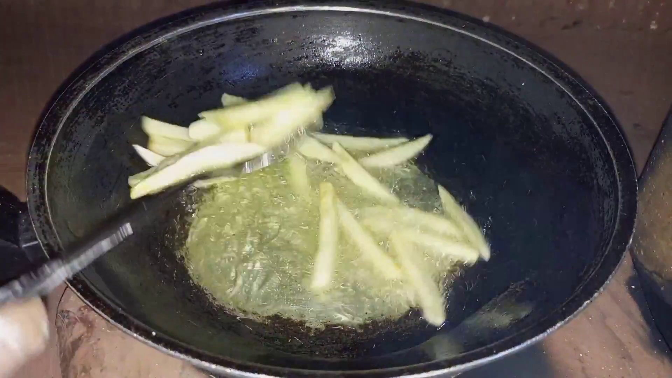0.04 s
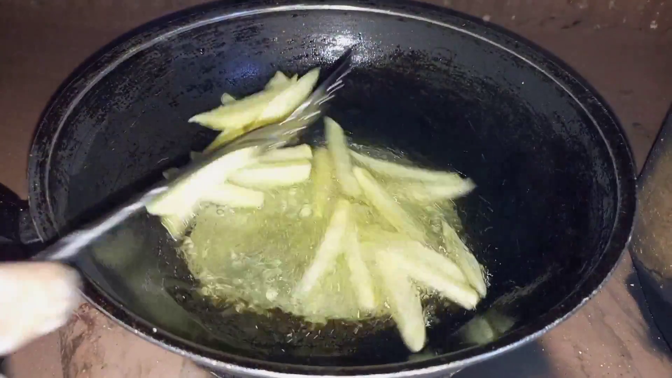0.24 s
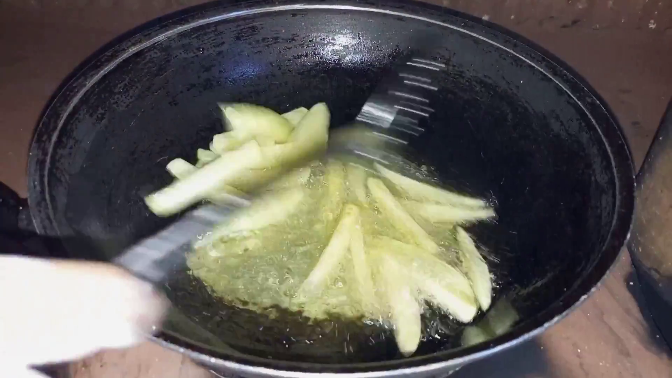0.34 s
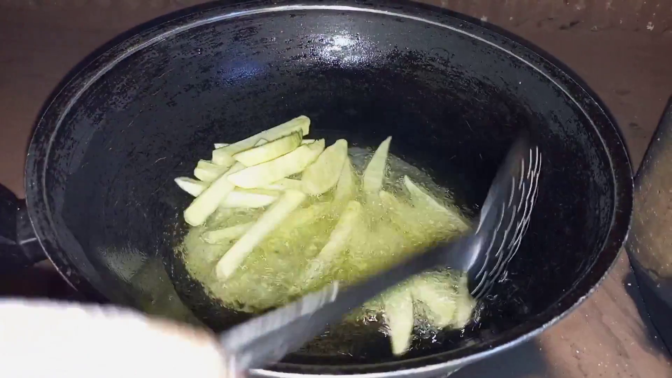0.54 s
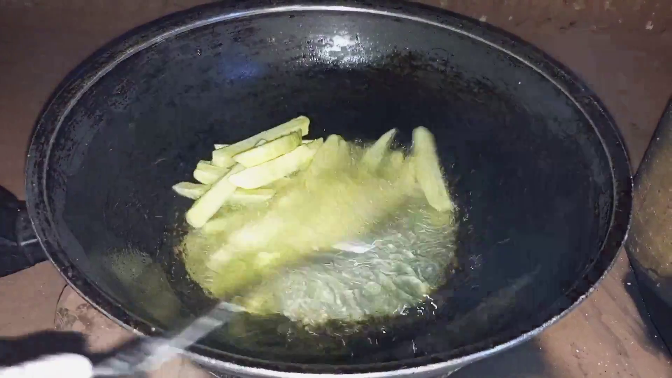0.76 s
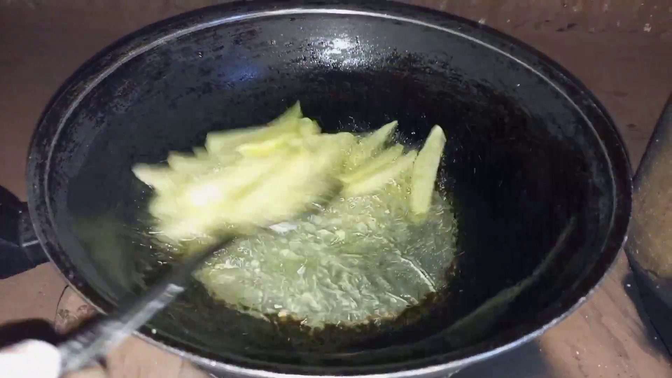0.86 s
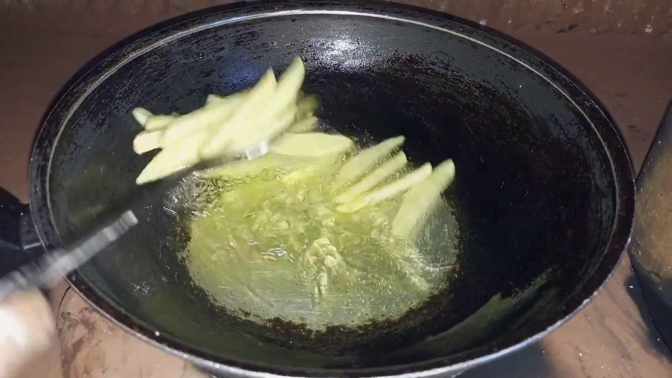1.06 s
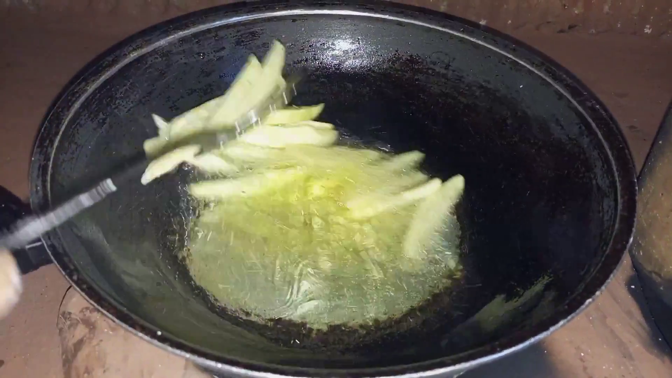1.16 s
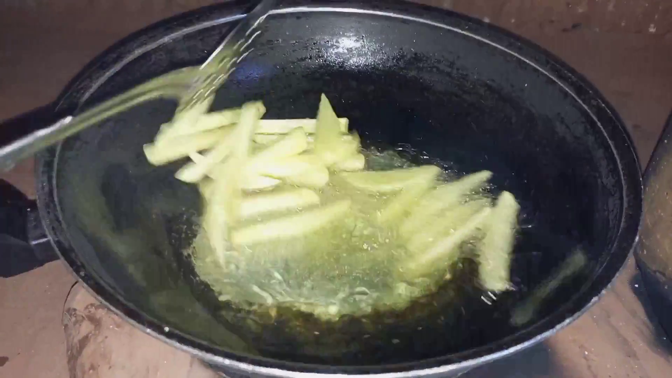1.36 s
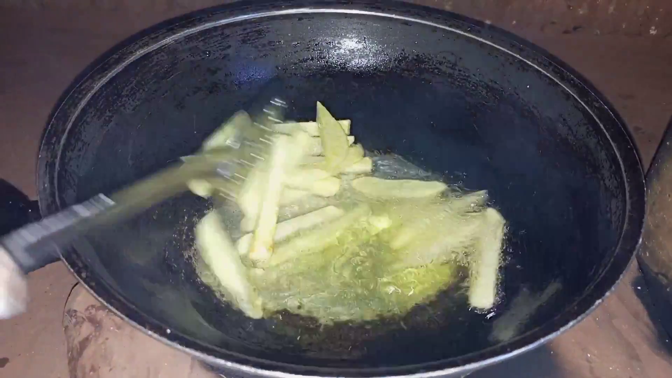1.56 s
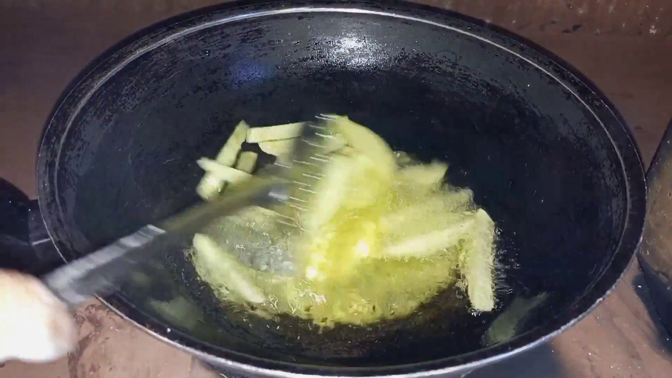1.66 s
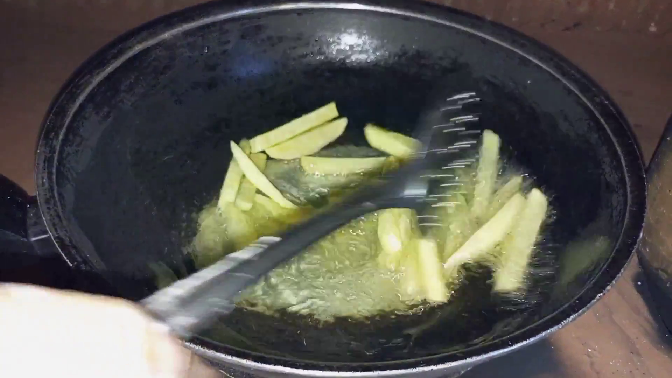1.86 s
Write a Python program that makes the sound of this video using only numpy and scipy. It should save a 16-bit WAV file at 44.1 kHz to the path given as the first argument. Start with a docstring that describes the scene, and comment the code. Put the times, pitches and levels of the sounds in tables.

```python
"""Frying oil fizzes throughout: hiss plus tiny bubble bursts, with a restless treble over a steadier low part.
Potato sticks cook in an iron wok while a slotted metal skimmer stirs them.
Food nudges single modes of the metal; the skimmer's slides drive all modes with random slips,
and its knocks set them off together. Soft low bumps of swelling noise come through the stove."""
import sys
import numpy as np
from scipy import signal
from scipy.io import wavfile
from scipy.ndimage import uniform_filter1d

SR = 44100
rng = np.random.default_rng(int(sys.argv[2]) if len(sys.argv) > 2 else 0)


def pcm_store(signal):
    """Save signal as 16-bit PCM."""
    levels = np.round(np.clip(np.atleast_2d(signal), -1, 1) * 32767)
    wavfile.write(sys.argv[1], SR, levels.astype(np.int16).T)


def volts_from_db(level):
    """Convert decibel levels to linear amplitude ratios."""
    exponent = np.asarray(level, float) / 20
    return 10 ** exponent


N = 85995

# modes of wok and skimmer: frequency [Hz]
METAL_HZ = [337, 440, 558, 590, 669, 785, 834, 975, 1125, 1190, 1258, 1385, 1530, 1690, 1770, 1840, 1935,
            2125, 2405, 2530, 2690, 2830, 3150, 3340, 3700, 3985, 4570, 4810, 5120, 5187, 5500, 5789, 5950,
            6222, 6475, 6610, 6975, 7351, 7396, 10932]


def evened(x):
    """Scales to rms 1."""
    return x / np.sqrt(np.mean(x ** 2) + 1e-20)


def add(mix, start_s, sound):
    """Mixes a sound in at start_s, cut at the end of the mix."""
    part = mix[round(start_s * SR):][:len(sound)]
    part += sound[:len(part)]


def clicks(per_s, spread_db, size):
    """Random clicks of either sign; their dB offsets are exponentially distributed, up to 5 spreads."""
    when = rng.random(size)
    offset = np.minimum(rng.exponential(1, size), 5)
    sign = rng.choice([-1, 1], size)
    return (when < per_s / SR) * sign * volts_from_db(spread_db * offset)


def octave_bell(x, time_s, centre_hz, spread_oct):
    """Keeps a bell-shaped range of octaves round a centre that may move in time."""
    hz, t, z = signal.stft(x, SR, nperseg=1024, noverlap=896)
    off = np.log2((hz[:, None] + 1) / np.interp(t, time_s, centre_hz)) / spread_oct
    return signal.istft(z * np.exp(-off ** 2 / 2), nperseg=1024, noverlap=896)[1][:len(x)]


def resonate(x, hz, width_hz):
    """A resonance of gain 1: shift hz down to zero, smooth with one pole, shift back."""
    turn = np.exp(2j * np.pi * np.cumsum(hz * np.ones(len(x))) / SR)
    r = np.exp(-np.pi * width_hz / SR)
    return 2 * (turn * signal.lfilter([1 - r], [1, -r], x / turn + 1e-18)).real


def ring(weight):
    """All modes of the metal set off at once as decaying sines, each with its weight."""
    # decay of each mode, in the order of METAL_HZ: (level [dB], t60 [s])
    metal_ring = [(4.5, 0.065), (-4.5, 0.061), (3.5, 0.061), (1.5, 0.061), (-10.5, 0.45), (-0.5, 0.075),
                  (-9, 0.13), (-7, 0.17), (4.5, 0.046), (-6, 0.18), (-11.5, 0.25), (-9.5, 0.16),
                  (-3, 0.026), (-19, 0.14), (-8.5, 0.11), (-8.5, 0.097), (1, 0.061), (-4, 0.066),
                  (1, 0.042), (0.5, 0.047), (-5.5, 0.083), (-9, 0.067), (-6.5, 0.091), (-5, 0.051),
                  (-23, 0.34), (-13, 0.15), (-4.5, 0.054), (-4, 0.044), (-9.5, 0.35), (1, 0.066),
                  (-30, 0.026), (-4.5, 0.17), (-11, 0.12), (7.5, 0.038), (-3.5, 0.19), (4.5, 0.054),
                  (-24, 0.14), (5.5, 0.13), (-19, 0.059), (0.5, 0.12)]
    hz = np.c_[METAL_HZ]
    db, t60_s = np.transpose(metal_ring)[:, :, None]
    t = np.arange(SR // 3) / SR
    modes = volts_from_db(db - 60 * t / t60_s) * np.sin(2 * np.pi * hz * t)
    return (weight[:, None] * modes).sum(0)


def bubble_pops():
    """Bubbles bursting in the oil: random clicks ring short, fast-damped sines of 12 pitches."""
    pops_per_s, pop_spread_db = 2500, -1  # rate over all pitches
    t = np.arange(1, 60) / SR
    pops = np.zeros(N)
    for hz in np.geomspace(1500, 16000, 12):
        burst = np.sin(2 * np.pi * hz * t) * t * np.exp(-t * hz / 0.88) * hz ** 0.5
        pops += signal.oaconvolve(clicks(pops_per_s / 12, pop_spread_db, size=N), burst)[:N]
    return pops


def fizz():
    """Hiss plus bubble pops, patchy and flickering; the treble follows the frying, the low part is steadier."""
    # relative spectrum of the fizz: (frequency [Hz], density [dB per Hz])
    fizz_spectrum = [(25, -48), (60, -24.5), (140, -8.5), (230, -22), (400, -16), (700, -18.5), (1200, -18),
                     (1900, -9), (3030, -16.5), (3900, -12), (4400, -18), (5300, -6.5), (6600, 1.5),
                     (7800, -3), (9000, 2), (10000, -2.5), (11000, -14.5), (12500, -21.5), (14000, -21),
                     (15600, -7)]
    # treble course before gain_db: (time [s], level [dB])
    fizz_level = [(0, -55.5), (.2, -52), (.5, -50), (.7, -51), (.85, -49.5), (1.05, -53), (1.3, -48.5),
                  (1.55, -50.5), (1.7, -51), (1.8, -53.5), (1.95, -52)]
    gain_db, pop_share = 4, 0.08  # share of power, above 1200 Hz only
    steady_below_hz, steady_db = 1770, -53  # steady_db is before gain_db
    patchy_db, flicker_db = 1.9, 0.6  # rms
    hz, s, z = signal.stft(bubble_pops(), SR, nperseg=512, noverlap=384)
    z /= np.sqrt((abs(z) ** 2).mean(1, keepdims=True)) + 1e-12
    a, b, patches = rng.standard_normal((len(s), len(hz), 3)).T
    share = pop_share * (hz > 1200)[:, None]
    z = np.sqrt(share) * z + np.sqrt((1 - share) / 2) * (a + 1j * b)

    patches = evened(uniform_filter1d(uniform_filter1d(patches, 8, 0), 20, 1))
    flicker = evened(uniform_filter1d(rng.standard_normal(len(s)), 6))
    f, db = np.transpose(fizz_spectrum)
    shape = volts_from_db(np.interp(np.log(hz + 1), np.log(f + 1), db))[:, None]
    follows = 1 / (1 + (steady_below_hz / (hz + 1)) ** 4)[:, None]
    level_db = follows * np.interp(s, *np.transpose(fizz_level)) + (1 - follows) * steady_db
    shaped_rms = np.sqrt(np.mean(signal.istft(z * shape, nperseg=512, noverlap=384)[1] ** 2))
    z *= shape / shaped_rms * volts_from_db(gain_db + level_db + patchy_db * patches + flicker_db * flicker)
    return signal.istft(z, nperseg=512, noverlap=384)[1][:N]


def nudges():
    """Food shifting against the wok: each mode is now and then set off softly on its own."""
    level_db, centre_hz, spread_oct = -65, 3300, 1.96
    per_s, spread_db, t60_s = 30, 2.5, .07  # rate of each mode
    t = np.arange(SR // 5) / SR
    out = np.zeros(N)
    for hz in METAL_HZ:
        weight = np.exp(-(np.log2(hz / centre_hz) / spread_oct) ** 2 / 2)
        swell = 1 - np.exp(-t / 0.0062)
        ping = weight * swell * volts_from_db(-60 * t / t60_s) * np.sin(2 * np.pi * hz * t)
        out += signal.oaconvolve(clicks(per_s, spread_db, size=N), ping)[:N]
    return volts_from_db(level_db) * evened(out)


def slide(spread_oct, rows, body):
    """Uneven slips of the edge ring the metal and rasp; the place of contact picks the range that sounds."""
    slips_per_s, slip_spread_db = 3000, 4
    rasp = .3  # plain slips beside the ring
    s, hz, db = np.transpose(rows)
    t = np.arange(s[0] - .1, s[-1], 1 / SR)  # 0.1 s lead-in lets the ring build up
    slips = clicks(slips_per_s, slip_spread_db, size=len(t))
    ringing = signal.oaconvolve(slips, body)[:len(t)]
    sound = evened(octave_bell(ringing, s - t[0], hz, spread_oct))
    sound = sound + rasp * evened(octave_bell(slips, s - t[0], hz, spread_oct))
    sound = sound / np.sqrt(uniform_filter1d(sound ** 2, 1800) + 0.0038)  # even out the level
    fade = np.clip(np.minimum(t - s[0], s[-1] - t) / 0.0027, 0, 1)
    return s[0], (sound * fade * volts_from_db(np.interp(t, s, db)))[t >= s[0]]


def bump(start_s, level_db, hz, t60_s):
    """A soft dull push: low noise that swells quickly and dies."""
    t = np.arange(0, .2, 1 / SR)
    noise = rng.standard_normal(len(t))
    for _ in range(2):
        noise = resonate(noise, hz, 0.7 * hz)
    swell = 1 - np.exp(-t / 0.017)
    return start_s, evened(noise) * swell * volts_from_db(level_db - 60 * t / t60_s)


def knock(start_s, level_db, centre_hz, spread_oct):
    """Modes near the centre start together, drop quickly, then ring out, with a faint tick of noise."""
    tick_db, tick_s = -7, .003  # tick_s to 1/e
    contact_db, contact_s = 5.5, 0.016  # extra ring that the touching edge damps at once
    off = np.log2(np.divide(METAL_HZ, centre_hz)) / spread_oct
    sound = ring(np.exp(-off ** 2 / 2) * volts_from_db(1.5 * rng.standard_normal(len(off))))
    t = np.arange(len(sound)) / SR
    noise = octave_bell(rng.standard_normal(len(t)), [0], [centre_hz], spread_oct)
    tick = evened(noise) * np.exp(-t / tick_s)
    sound = sound * volts_from_db(contact_db * np.exp(-t / contact_s))
    sound = sound / np.sqrt(np.mean(sound[:400] ** 2)) + volts_from_db(tick_db) * tick
    rise_s = 0.0012 / np.sqrt(spread_oct)  # narrow knocks start softer
    rise = np.sin(np.pi / 2 * np.minimum(t / rise_s, 1)) ** 2
    return start_s, volts_from_db(level_db) * sound * rise


def radiated(metal):
    """The metal radiates little bass and little top."""
    return signal.sosfilt(signal.butter(4, (274, 11500), "bandpass", fs=SR, output="sos"), metal)


def scene():
    """Oil, nudges, slides, bumps and knocks, the same in both channels."""
    # slides of the skimmer: (spread [octaves], [(time [s], centre of excited range [Hz], level [dB])])
    slide_rows = [(0.24, [(0, 624, -56.5), (.04, 664, -52.5), (.1, 700, -59.5), (.14, 1250, -61.5),
                  (.19, 2120, -54.5), (.23, 2500, -53.5), (.27, 2470, -64), (.32, 2050, -56.5)]),
                  (0.29, [(0, 1110, -65.5), (.17, 1130, -68)]), (0.074, [(.78, 1204, -44), (.86, 1250, -52),
                  (.9, 1440, -49.5), (1.01, 1110, -59)]), (0.36, [(.41, 440, -60.5), (.45, 507, -60),
                  (.5, 514, -66), (.56, 330, -69), (.585, 350, -79)]), (0.47, [(.41, 1430, -63),
                  (.45, 1960, -63.5), (.5, 2000, -54.5), (.52, 2240, -65.5), (.56, 1550, -59.5),
                  (.6, 1820, -89)]), (.06, [(.577, 3130, -55), (.63, 3220, -55), (.68, 3100, -63)]),
                  (0.54, [(.73, 523, -47), (.79, 504, -41.5), (.83, 453, -46.5), (.86, 386, -59),
                  (.89, 550, -47), (.935, 605, -50), (1.0, 610, -47), (1.02, 640, -54), (1.06, 590, -65)]),
                  (0.77, [(.725, 2440, -40.5), (.8, 1890, -53), (.86, 2560, -55), (.89, 1890, -49.5),
                  (.94, 2000, -54), (.96, 2200, -46.5), (1.02, 2000, -69), (1.07, 2050, -61)]),
                  (0.45, [(.72, 5200, -32.5), (.775, 4760, -48)]), (0.1, [(.77, 5100, -57),
                  (.835, 5250, -48.5), (.87, 5800, -54.5), (.92, 5640, -49.5), (.96, 5900, -62)]),
                  (0.02, [(1.045, 577, -48.5), (1.11, 593, -59.5), (1.15, 596, -63.5), (1.18, 632, -60),
                  (1.22, 613, -77)]), (0.24, [(1.18, 2050, -62), (1.2, 2330, -58.5), (1.26, 2380, -58),
                  (1.28, 3080, -51), (1.31, 3200, -55), (1.35, 3000, -66)]), (0.2, [(1.37, 337, -65),
                  (1.45, 335, -69), (1.5, 337, -62.5), (1.56, 340, -68.5)]), (0.44, [(1.45, 646, -52),
                  (1.5, 750, -65), (1.59, 885, -73)]), (0.17, [(1.42, 6340, -72), (1.52, 6700, -54),
                  (1.555, 6340, -45), (1.6, 6200, -49.5), (1.68, 6300, -50.5), (1.72, 6340, -79)]),
                  (1, [(1.68, 755, -69), (1.75, 1300, -61.5), (1.82, 900, -68)])]
    # soft low bumps: (time [s], level [dB], frequency [Hz], t60 [s])
    bump_rows = [(0.035, -57, 139, 0.13), (0.282, -48.5, 241, 0.052), (0.816, -53, 127, 0.094),
                 (0.969, -46.5, 116, 0.084), (1.70, -55, 109, 0.14), (1.742, -58.5, 123, 0.16)]
    # skimmer blows, some exciting several ranges at once:
    # (time [s], level [dB], centre of excited range [Hz], spread [octaves])
    knock_rows = [(0.139, -49.5, 1713, 0.033), (.222, -44.5, 2616, 0.051), (0.41, -49.5, 1480, 0.13),
                  (0.7161, -29, 690, 0.7), (0.719, -35.5, 2760, 0.6), (0.7168, -29, 6240, 0.79),
                  (0.772, -35, 1090, 0.48), (0.838, -40.5, 1300, 0.21), (0.837, -43.5, 2510, 0.074),
                  (.872, -39, 1560, 0.9), (.946, -33, 1280, 0.97), (1.427, -42, 816, 0.047),
                  (1.428, -42.5, 597, 0.051), (1.425, -47, 1180, 0.066), (1.425, -52.5, 340, 0.11),
                  (1.483, -50.5, 856, 0.054)]
    mix, metal = fizz(), nudges()
    body = ring(rng.choice([-1, 1], len(METAL_HZ)))
    for spread_oct, rows in slide_rows:
        add(metal, *slide(spread_oct, rows, body))
    for row in bump_rows:
        add(mix, *bump(*row))
    for row in knock_rows:
        add(metal, *knock(*row))
    mix = mix + radiated(metal)
    return np.array([mix, mix])


def roll_off(x):
    """The treble ends steeply here."""
    return signal.sosfilt(signal.butter(12, 16780, fs=SR, output="sos"), x)


def record(dry):
    """Low cut and band limit of the finished mix."""
    low_cut_hz, edge_hz = 44, 15650
    dry = signal.sosfilt(signal.butter(2, low_cut_hz, "highpass", fs=SR, output="sos"), dry)
    lowpass = signal.firwin(511, edge_hz, window=("kaiser", 9), fs=SR)
    mix = signal.oaconvolve(dry, lowpass[None], "same")
    return roll_off(mix)


dry = scene()
out = record(dry)
pcm_store(out)
```